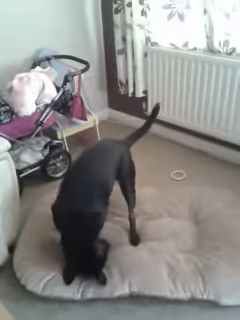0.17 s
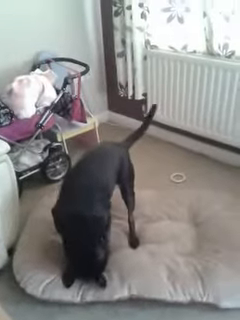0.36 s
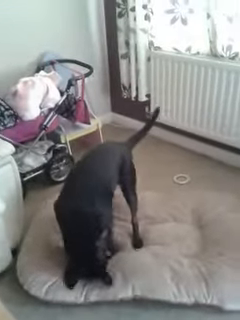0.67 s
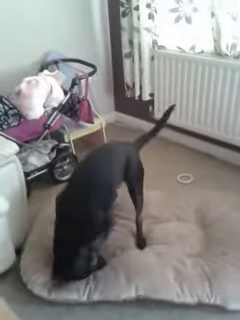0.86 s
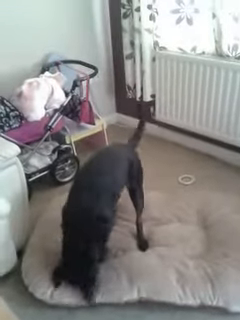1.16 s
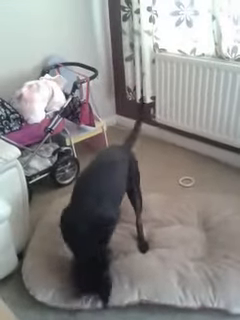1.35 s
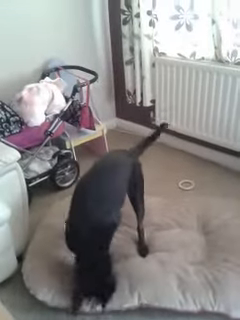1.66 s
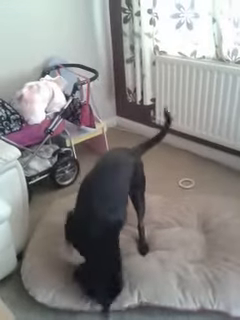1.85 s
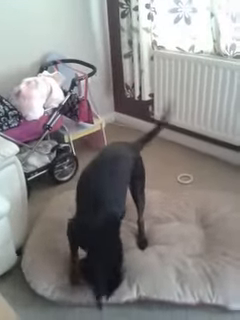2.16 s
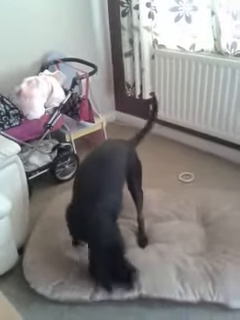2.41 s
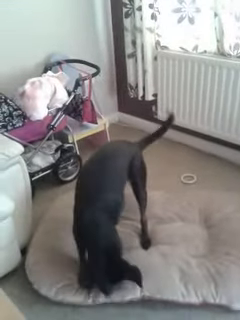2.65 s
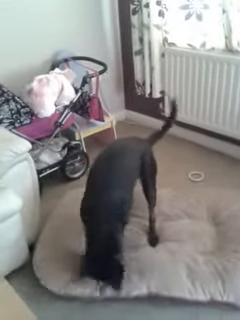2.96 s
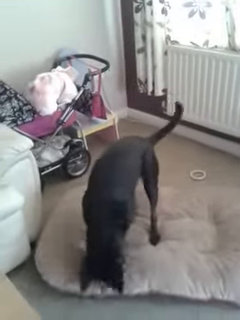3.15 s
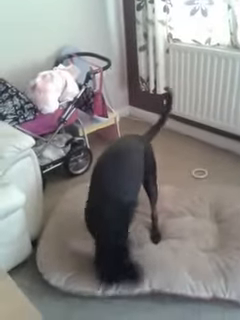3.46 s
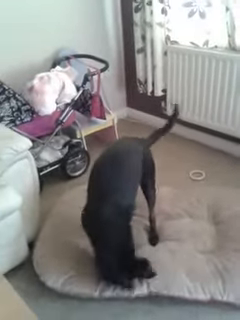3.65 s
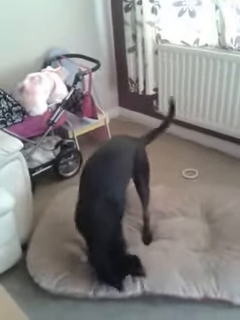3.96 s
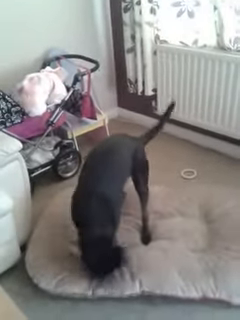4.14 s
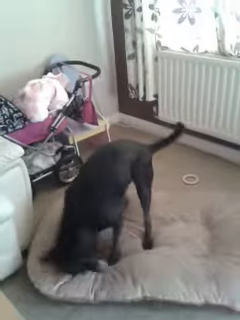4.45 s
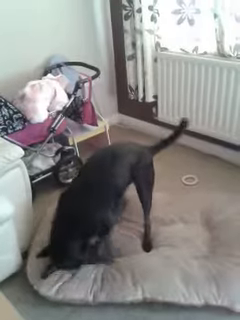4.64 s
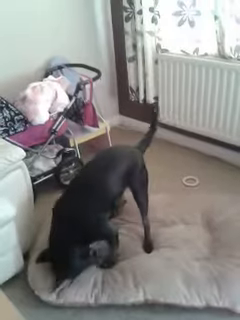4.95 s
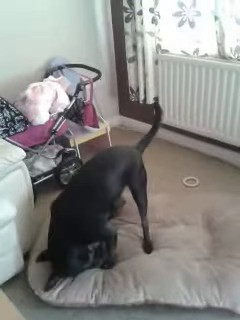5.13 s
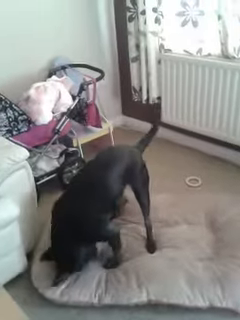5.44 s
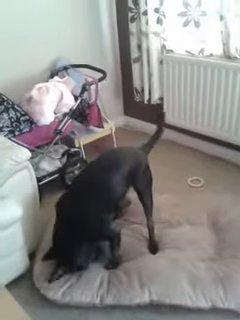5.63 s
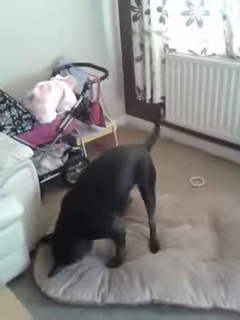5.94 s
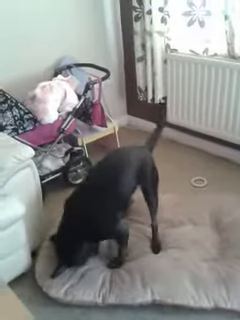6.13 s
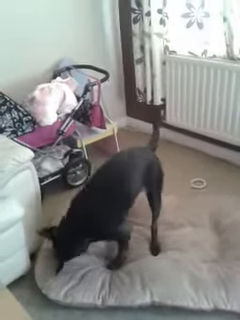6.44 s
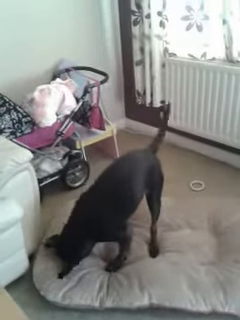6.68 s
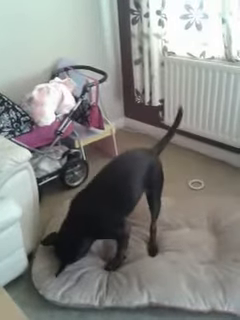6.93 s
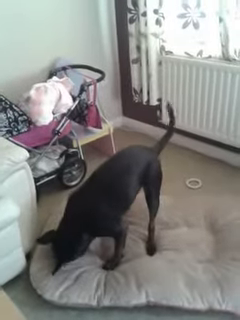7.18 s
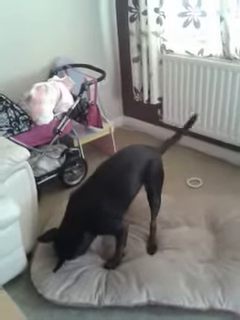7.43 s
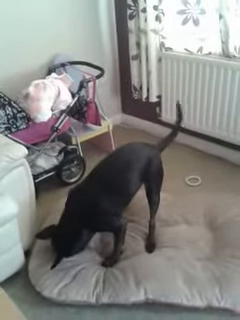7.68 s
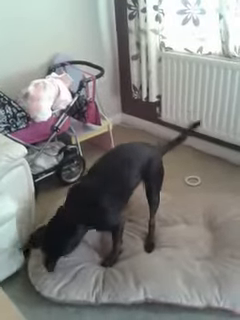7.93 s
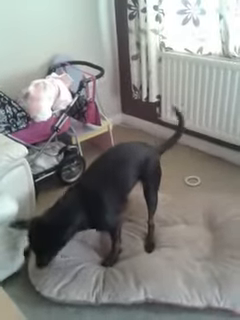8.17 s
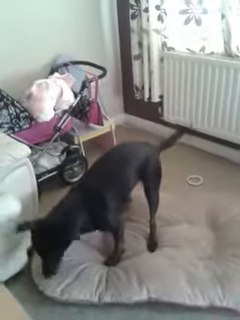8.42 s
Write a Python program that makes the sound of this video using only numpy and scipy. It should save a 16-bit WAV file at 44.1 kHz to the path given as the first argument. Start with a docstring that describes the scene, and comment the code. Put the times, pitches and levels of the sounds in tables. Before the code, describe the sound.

Irregular fabric rubbing, scratching and padded paw thumps in a small room, with three knocks past the middle, the last clinking sharply.

```python
"""Soft rubbing and dull thumps: a dog roots in a cushioned bed in a small, lively living room.
Muzzle, paws and claws make the cover's threads slip and hiss, and paws sink into the padding.
Past the middle, three blows land on something hard and shake a metal piece, the last with a bright
clink that overloads the microphone of a phone a few metres away."""
import sys
import numpy as np
from scipy import signal
from scipy.fft import rfft, irfft
from scipy.io import wavfile
from scipy.ndimage import uniform_filter1d

SR = 44100
rng = np.random.default_rng(int(sys.argv[2]) if len(sys.argv) > 2 else 0)


def generate_wav(sig):
    """Save sig (samples, or channels by samples) to the path in sys.argv[1] as 16-bit PCM at SR."""
    pcm = np.round(np.clip(np.atleast_2d(sig).T, -1, 1) * 32767).astype(np.int16)
    wavfile.write(sys.argv[1], SR, pcm)


N = 377055
HIT = int(0.6 * SR)  # samples in one hit or room response
SCENE_T, HIT_T = np.arange(N) / SR, np.arange(HIT) / SR  # seconds


def undb(db):
    """Decibels to gain."""
    return 10 ** (np.asarray(db) / 20)


def unit(x):
    """Scale to rms 1."""
    return x / np.sqrt(np.mean(x ** 2))


def unit_attack(x):
    """Scale a hit so that its first 50 ms have rms 1."""
    return x / np.sqrt(np.mean(x[:SR // 20] ** 2))


def add(track, start_s, sound):
    """Mix a sound into the track."""
    i = int(start_s * SR)
    track[i:i + len(sound)] += sound[:N - i]


def convolve(x, response):
    """Causal filtering, same length."""
    return signal.fftconvolve(x, response)[:len(x)]


def colour(x, curve, bright_db=0, corner_hz=1500, size=4096):
    """Minimum-phase EQ through (Hz, dB) points, with a treble shelf for harder contact."""
    hz, db = np.transpose(curve)
    f = np.maximum(np.fft.rfftfreq(size, 1 / SR), 1)
    shelf_db = bright_db * f ** 2 / (f ** 2 + corner_hz ** 2)
    gain = undb(np.interp(np.log(f), np.log(hz), db) + shelf_db)
    cepstrum = irfft(np.log(gain))
    cepstrum[1:size // 2] *= 2
    cepstrum[size // 2 + 1:] = 0
    return convolve(x, irfft(np.exp(rfft(cepstrum))))


def walk(per_s):
    """A control signal gliding between random values, rms 1."""
    step = int(SR / per_s)
    held = np.repeat(rng.standard_normal(N // step + 1), step)
    return unit(uniform_filter1d(held, step)[:N])


def ring(modes, tilt_db=0):
    """Decaying (Hz, dB, t60 s) modes, tilted in dB per octave above the lowest."""
    out = np.zeros(HIT)
    for hz, db, t60 in modes:
        gain = undb(db + tilt_db * np.log2(hz / modes[0][0]))
        out += gain * np.sin(2 * np.pi * hz * HIT_T) * undb(-60 * HIT_T / t60)
    return out


# The living room's reverb. Each row: frequency in Hz, seconds to fade by 60 dB.
ROOM_DECAY = [(150, 0.42), (500, 0.33), (1200, 0.49), (3000, 0.54), (7000, 0.94)]


def room(direct_db, early_s=0.017, early_db=0, build_s=0.0005):
    """Response from one spot: direct sound, early reflections, then a tail whose treble lasts longest."""
    f = np.fft.rfftfreq(HIT, 1 / SR)
    hz, t60s = np.transpose(ROOM_DECAY)
    spectrum = rfft(rng.standard_normal(HIT))
    tail = sum(irfft(spectrum * np.interp(f, hz, band), HIT) * undb(-60 * HIT_T / t60)
               for band, t60 in zip(np.eye(len(hz)), t60s))
    tail *= 1 - np.exp(-HIT_T / build_s)
    tail *= 1 + undb(early_db) * np.exp(-(HIT_T / early_s) ** 2 / 2)
    return tail / np.linalg.norm(tail) + undb(direct_db) * signal.unit_impulse(HIT)


# The colour of the quiet room. Each row: frequency in Hz, gain in dB.
ROOM_TONE_EQ = [(20, 10.5), (45, -2), (70, -14), (100, -17.5), (200, -12), (500, -6), (2000, -10.5),
                (7000, -15.5)]


def room_tone():
    """A faint, steady rumble and hiss under everything."""
    return undb(-56) * unit(colour(rng.standard_normal(N), ROOM_TONE_EQ))


# Sub-bass bumps. Each row: start in seconds, level in dB, pitch in Hz, decay time constant in seconds.
WEIGHT_SHIFTS = [(2.915, -45, 55, 0.036), (3.089, -41, 35.6, 0.029)]


def bumps():
    """The dog shifts its weight, giving a few slow swings of deep bass."""
    out = np.zeros(N)
    for start_s, db, hz, decay_s in WEIGHT_SHIFTS:
        add(out, start_s, undb(db) * np.sin(2 * np.pi * hz * HIT_T) * np.exp(-HIT_T / decay_s))
    return out


# The resting muzzle's faint rub, as a fader curve. Each row: time in seconds, level in dB.
MUZZLE_REST = [(0.0, -82), (2.07, -58), (2.83, -56.5), (3.17, -68), (4.09, -54), (5.14, -64), (6.02, -50),
               (7.33, -56), (7.9, -52), (8.55, -61)]
# Slow sweeps. Each row: middle in seconds, length in seconds, hiss in dB, padding against hiss in dB.
MUZZLE_SWEEPS = [(.06, 0.18, -56.5, -5.5), (0.786, .13, -54, 2), (0.859, 0.14, -50, -4.5),
                 (1.322, 0.36, -52, -3.5), (1.85, 0.11, -55.5, -12), (2.025, 0.25, -51.5, -1),
                 (2.432, 0.25, -50, -7), (2.778, 0.58, -49.5, -8.5), (3.343, 0.15, -56, 1),
                 (3.73, 0.26, -60, 5.5), (4.19, 0.49, -46.5, -3), (4.507, 0.3, -57, 9),
                 (5.076, 0.12, -56.5, -1.5), (5.36, 0.2, -51, 7), (5.493, 0.16, -57, 21),
                 (5.636, .12, -62.5, 14), (5.812, 0.2, -45.5, -3), (6.02, 0.24, -39.5, -9),
                 (6.335, 0.14, -45, -6), (6.587, 0.47, -50.5, 3), (7.057, 0.26, -47.5, -12),
                 (7.456, 0.22, -53.5, -2), (7.682, 0.34, -56, 6.5), (7.883, 0.16, -35, -1.5),
                 (8.083, 0.45, -51, 1.5), (8.55, 0.13, -50.5, 1)]


def muzzle_strokes(edge_drop_db=10, roundness=2.03):
    """The muzzle rests on the cover and sweeps in even swells; yields (envelope, pressure in dB)."""
    yield undb(np.interp(SCENE_T, *np.transpose(MUZZLE_REST)) - 2), -2.5
    for middle_s, length_s, db, press_db in MUZZLE_SWEEPS:
        from_middle = np.minimum(np.abs(SCENE_T - middle_s) / (length_s / 2), 10)
        yield undb(db - edge_drop_db * from_middle ** roundness), press_db


def pull(start_s, attack_s, hold_s, fade_db_per_s):
    """Envelope of a quick pull over the cloth: it bites, holds and lets go."""
    attack = np.minimum(HIT_T / attack_s, 1)
    release = undb(-fade_db_per_s * np.maximum(HIT_T - attack_s - hold_s, 0))
    out = np.zeros(N)
    add(out, start_s, attack * release)
    return out


# Quick scratches. Each row: start in seconds, hiss in dB, padding against hiss in dB.
CLAW_SCRATCHES = [(.703, -55, -12.5), (0.923, -49.5, -6), (1.595, -72, 18), (2.269, -54, 10),
                  (2.869, -54, 18), (3.349, -55.5, 11), (3.478, -46.5, -19.5), (4.789, -49, 5),
                  (6.875, -55, 10)]


def claw_strokes():
    """Claws tug briefly at the cover; yields (envelope, pressure in dB)."""
    for start_s, db, press_db in CLAW_SCRATCHES:
        yield undb(db) * pull(start_s, attack_s=0.019, hold_s=0.0095, fade_db_per_s=156), press_db


def grains(per_s, spread_db):
    """Tiny slips of thread, of random size at random moments."""
    sizes = rng.standard_normal(N) * undb(spread_db * np.minimum(rng.exponential(size=N), 4))
    return unit(sizes * (rng.random(N) < per_s / SR))


def roaming(x, spots=4):
    """A source that moves about: its echoes crossfade between several spots, once round a second."""
    fades = (np.cos(np.pi * (2 * SCENE_T + k / spots)) for k in range(spots))
    return unit(sum(fade * convolve(x, room(direct_db=-6.5)) for fade in fades))


# The bright weave and the darker padding under it. Each row: frequency in Hz, gain in dB.
WEAVE_EQ = [(150, -42), (400, -12), (1000, 0), (1600, 2), (2400, 4.5), (3300, 1), (4200, -1), (5500, 4),
            (7000, -1)]
PADDING_EQ = [(60, -22.5), (110, -38), (180, -12), (330, 0.5), (500, 1), (850, 0.5), (1300, -5),
              (2200, -8.5), (3500, -19), (7000, -26)]


def rubbing(strokes):
    """Threads slip in small jerks: the weave hisses, and pressure brings up the padding's low rustle."""
    weave_power, padding_power = 0, 0
    for envelope, press_db in strokes:
        weave_power += envelope ** 2
        padding_power += (envelope * undb(press_db)) ** 2
    jerks = walk(per_s=45)
    weave = roaming(colour(grains(per_s=5000, spread_db=2), WEAVE_EQ))
    padding = roaming(colour(grains(per_s=700, spread_db=0), PADDING_EQ))
    hiss = weave * np.sqrt(weave_power) * undb(4 + 0.69 * jerks)
    rustle = padding * np.sqrt(padding_power) * undb(1 + 0.51 * jerks)
    return hiss + rustle


# Gliding rasps. Each row: start in seconds, length in seconds, level in dB, first and last pitch in Hz.
RIB_SWISHES = [(0.695, 0.048, -51.5, 2900, 2930), (0.758, 0.14, -51.5, 800, 955),
               (1.231, .13, -44, 1400, 1052), (1.593, 0.065, -54, 1000, 438), (1.889, 0.19, -47, 1148, 785),
               (2.634, 0.29, -50.5, 1944, 2073), (2.869, 0.072, -38.5, 753, 1405),
               (2.888, .05, -37.5, 1820, 3014), (3.609, 0.0208, -46, 897, 850),
               (3.738, 0.077, -52, 880, 740), (4.392, .19, -49, 950, 702.7), (5.27, 0.12, -37, 768, 1173),
               (5.305, .06, -41, 1990, 2556), (7.5, 0.04, -34, 990, 693), (7.809, 0.16, -41.5, 1291, 1602)]


def swishes(relative_bandwidth=0.38):
    """A claw drawn over the cover's ribs rasps in a broad band whose pitch follows its speed."""
    out = np.zeros(N)
    for start_s, length_s, db, first_hz, last_hz in RIB_SWISHES:
        n = int(length_s * SR)
        hz = np.geomspace(first_hz, last_hz, n)
        lowpass = signal.butter(2, relative_bandwidth * hz.mean() / 2, fs=SR, output="sos")
        roughness = signal.sosfilt(lowpass, rng.standard_normal((2, n)))
        phase = 2 * np.pi * np.cumsum(hz) / SR
        rasp = unit(roughness[0] * np.cos(phase) + roughness[1] * np.sin(phase))
        add(out, start_s, undb(db) * rasp * np.sin(np.linspace(0, np.pi, n)))
    return undb(-1.5) * convolve(out, room(direct_db=-4))


# The colour of a hit on the bed. Each row: frequency in Hz, gain in dB.
BED_EQ = [(40, -39.5), (100, -27.5), (170, -6), (240, -6.5), (330, 4.5), (520, 1.5), (750, 2.5), (1250, -3),
          (2000, -13.5), (3000, -17), (4200, -29.5), (7000, -31)]
# Paws landing. Each row: start in seconds, level in dB, brightness in dB, hiss of the drag in dB.
PAW_LANDINGS = [(0.18, -40.5, -25, -51), (0.509, -49, -12, -74), (1.231, -36, -16.5, -53),
                (1.779, -30.5, -24, -54), (2.233, -46.5, -27.5, -68), (2.333, -32, -18.5, -52),
                (2.934, -33, -21, -41.5), (3.068, -48, -25, -59.5), (3.379, -26.5, -15, -42.5),
                (4.408, -44, -8, -59), (4.438, -63, -16.5, -64), (4.495, -41.5, -35.5, -65),
                (4.689, -30, -9, -52.5), (4.72, -38.5, -19.5, -53.5), (5.672, -39, -47.5, -67.5),
                (6.387, -37, -1.5, -47), (6.406, -33, 10.5, -51), (6.875, -42, 3, -65),
                (7.507, -38, -6.5, -66), (7.57, -40, 7, -55)]


def paws():
    """Each paw slaps the cover and sinks in with a dull thump; the slap grows with the thump."""
    out = np.zeros(N)
    mean_bright_db = np.mean([row[2] for row in PAW_LANDINGS])
    for start_s, db, bright_db, _ in PAW_LANDINGS:
        shelf_db = bright_db - mean_bright_db
        scuff = room(direct_db=-17.5, early_s=0.028, early_db=-12.5, build_s=0.00048)
        thump = unit_attack(colour(scuff, BED_EQ, shelf_db))
        slap = colour(signal.unit_impulse(HIT), BED_EQ, shelf_db + 4)
        slap /= np.abs(slap).max()
        add(out, start_s, undb(db) * (undb(-5) * thump + undb(-0.5) * slap))
    return out


def paw_strokes(press_db=5.5):
    """Each paw drags over the cover as it lands; yields (envelope, pressure in dB)."""
    for start_s, _, _, drag_db in PAW_LANDINGS:
        yield undb(drag_db) * pull(start_s, attack_s=0.014, hold_s=0.022, fade_db_per_s=194), press_db


# Sharp, dry ticks. Each row: start in seconds, peak in dB.
CLAW_TICKS = [(2.936, -11.5), (2.945, -18), (6.387, -13.5), (6.407, -26.5)]


def ticks():
    """A claw catches in the cover and snaps free."""
    out = np.zeros(N)
    snap = colour(signal.unit_impulse(HIT), BED_EQ, bright_db=24)
    for start_s, db in CLAW_TICKS:
        add(out, start_s, undb(db) * snap / np.abs(snap).max())
    return out


# The colour of a blow's crack. Each row: frequency in Hz, gain in dB.
CRACK_EQ = [(40, -40), (100, -44.5), (200, -17.5), (350, -6), (600, -3), (950, 3.5), (1300, -2.5),
            (2100, -7.5), (2800, -16.5), (3600, -27), (5000, -30.5), (7000, -30.5)]
# The hard object's ring. Each row: frequency in Hz, level in dB, seconds to fade by 60 dB.
BODY_MODES = [(471, -2, .3), (705, -3, .2), (742, 0, .2), (884, -3, .2), (965, -3, .25), (1016, -3, .28),
              (1063, -2, .3), (1177, -2, .44), (1504, -5, .36), (1556, -8, .3), (1771, -10, .38),
              (1987, -9, .28), (2174, -13, .34)]
# Three blows, the last a double hit. Each row: start in seconds, level in dB, brightness in dB,
# rattle time in seconds, floor thud in dB.
BLOWS = [(5.359, -17, -7, 0.051, -65), (5.443, -22, -14, 0.1, -59), (5.819, -10, 8.5, 0.088, -46),
         (5.846, -14.5, 1, 0.053, -60.5)]


def knocks():
    """Hard blows rattle briefly, ring the struck body, thud through the floor and echo from the walls."""
    out = np.zeros(N)
    press_home = 1 - np.exp(-HIT_T / 0.006)  # the ring builds as the blow presses home
    floor_thud = ring([(62, 0.018, 0.22)])
    for start_s, db, bright_db, rattle_s, thud_db in BLOWS:
        rattle = room(direct_db=-23, early_s=rattle_s, early_db=6, build_s=0.00054)
        crack = unit_attack(colour(rattle, CRACK_EQ, bright_db))
        body = unit_attack(ring(BODY_MODES, tilt_db=0.83 * bright_db) * press_home)
        add(out, start_s, undb(db) * unit_attack(crack + undb(-6.5) * body))
        add(out, start_s, undb(thud_db) * floor_thud)
    return out


# The metal's ring; close pairs beat. Each row: frequency in Hz, level in dB, seconds to fade by 60 dB.
METAL_MODES = [(2414, 0, .3), (2426, -12, .42), (3716, -13, .3), (3745, -19, .22), (4582, -7, .27),
               (4603, -20, .45), (5179, -25, .3), (6430, -23, .2), (7075, -17, .16)]
# The metal piece jolted by the blows. Each row: start in seconds, level in dB, tilt in dB per octave.
METAL_HITS = [(5.362, -46, 11), (5.446, -46, 9), (5.539, -62, 8), (5.822, -17, 5), (5.851, -7, -22),
              (5.88, -17, -12), (5.958, -21, -15)]


def clinks(wobble_db=2, choke_at_s=5.905, choke_s=0.035, choke_db=-7.5):
    """The metal shivers with the first blows, chatters with the last and drops on cloth that chokes it."""
    metal = np.zeros(N)
    attack = 1 - np.exp(-HIT_T / 0.0028)
    for start_s, db, tilt_db in METAL_HITS:
        add(metal, start_s, undb(db) * ring(METAL_MODES, tilt_db) * attack)
    settled = np.clip((SCENE_T - choke_at_s) / choke_s, 0, 1)
    metal *= undb(wobble_db * walk(per_s=60) + choke_db * settled)
    return metal + undb(-18.5) * convolve(metal, room(direct_db=-28.5))


def scene():
    """The dog's noises over the quiet of the room, in mono."""
    background = room_tone() + bumps()
    cloth = rubbing([*muzzle_strokes(), *claw_strokes(), *paw_strokes()]) + swishes()
    return (background + cloth + paws() + ticks() + knocks() + clinks())[None]


# The phone's tone after its overload. Each row: frequency in Hz, gain in dB.
PHONE_EQ = [(40, -8.5), (105, -6), (160, -1), (7000, 0), (9000, -7.5), (16000, -1)]


def record(dry, mic_top_hz=7100, clip_level=0.72, dc_offset=0.0014, output_top_hz=15800):
    """A narrow-band phone microphone rounds off the loudest peaks, thins the bass and adds slight DC."""
    narrow = signal.sosfilt(signal.cheby1(14, 0.3, mic_top_hz, fs=SR, output="sos"), dry[0])
    rounded = narrow / (1 + (narrow / clip_level) ** 6) ** (1 / 6)
    toned = colour(rounded, PHONE_EQ) + dc_offset
    high_cut = signal.ellip(8, 0.2, 70, output_top_hz, fs=SR, output="sos")
    return signal.sosfilt(high_cut, toned)[None]


dry = scene()
out = record(dry)
generate_wav(out)
```